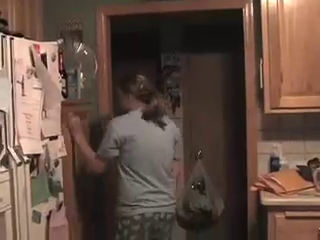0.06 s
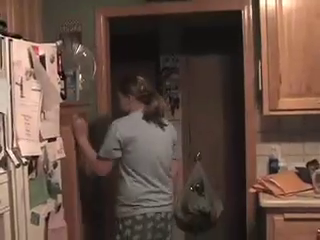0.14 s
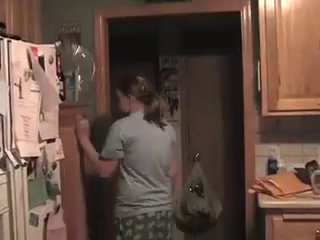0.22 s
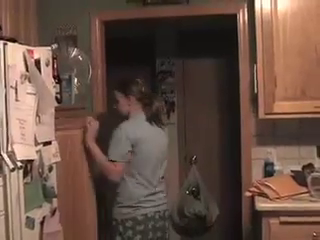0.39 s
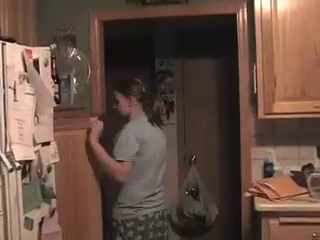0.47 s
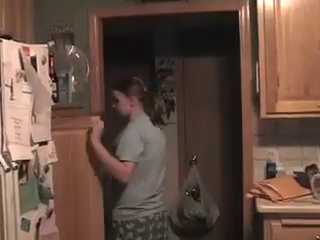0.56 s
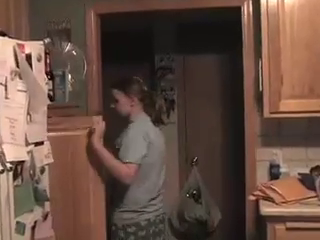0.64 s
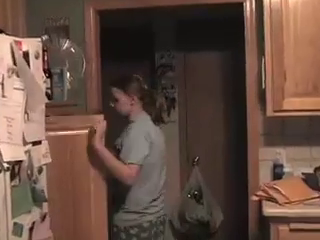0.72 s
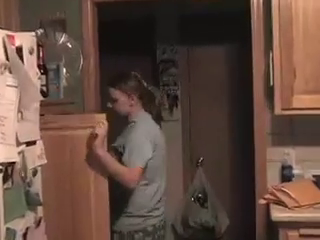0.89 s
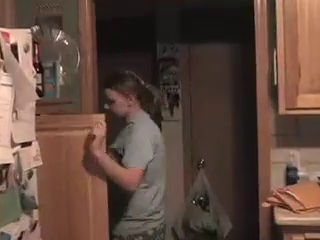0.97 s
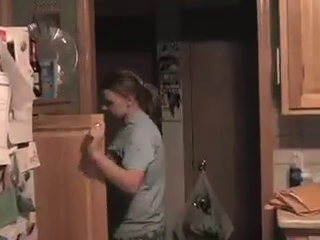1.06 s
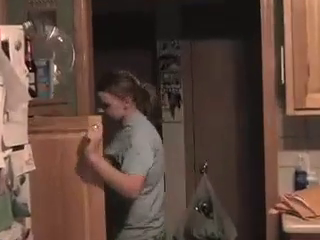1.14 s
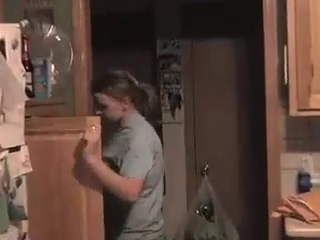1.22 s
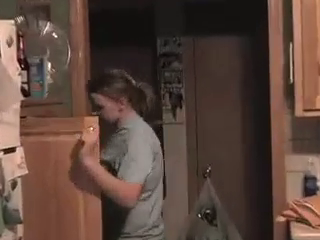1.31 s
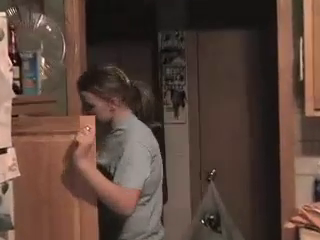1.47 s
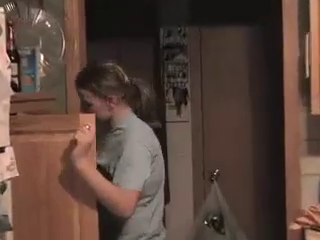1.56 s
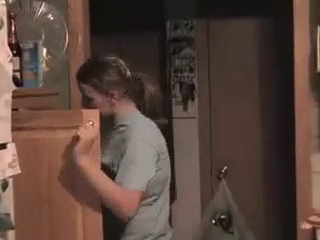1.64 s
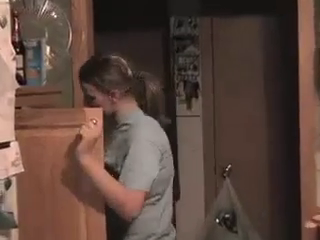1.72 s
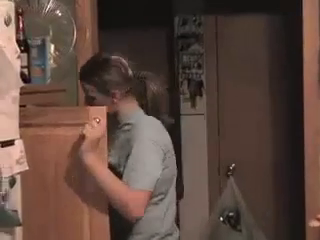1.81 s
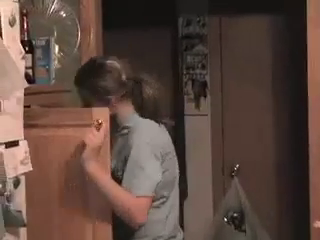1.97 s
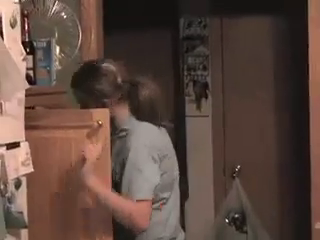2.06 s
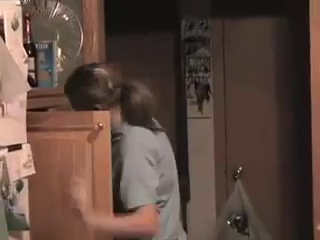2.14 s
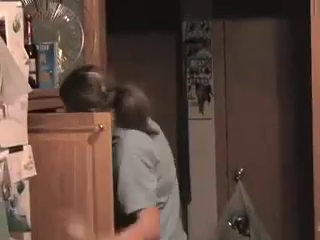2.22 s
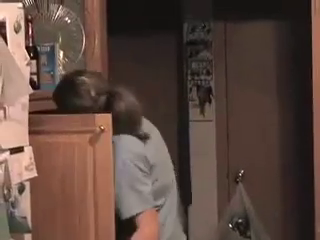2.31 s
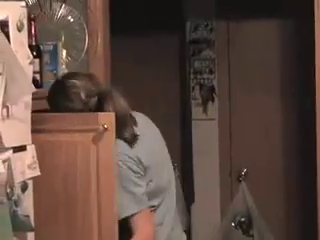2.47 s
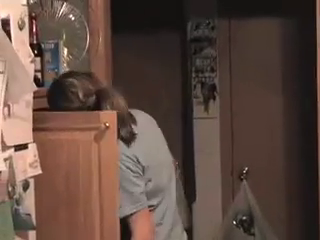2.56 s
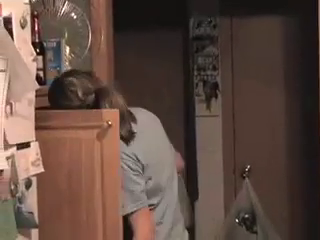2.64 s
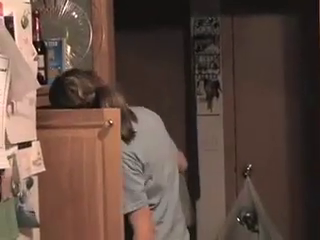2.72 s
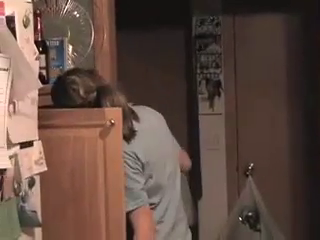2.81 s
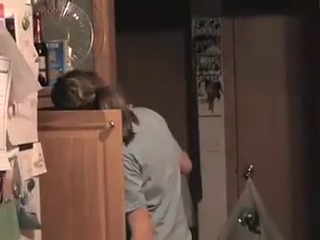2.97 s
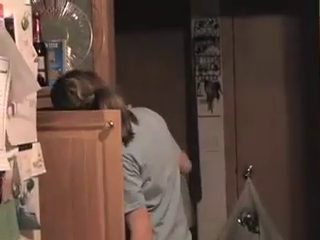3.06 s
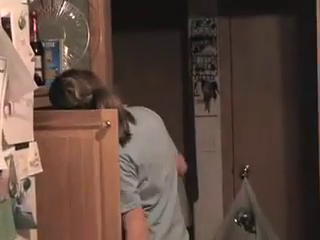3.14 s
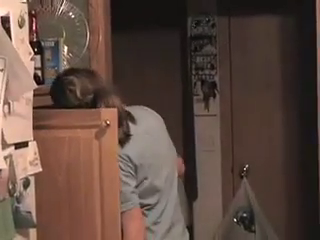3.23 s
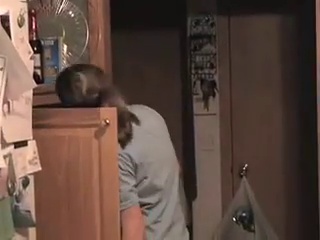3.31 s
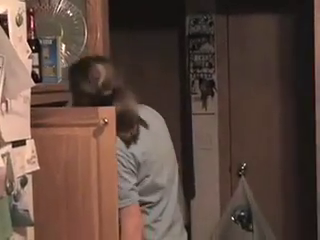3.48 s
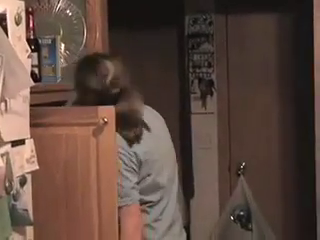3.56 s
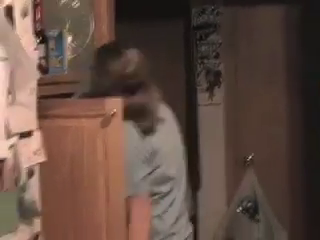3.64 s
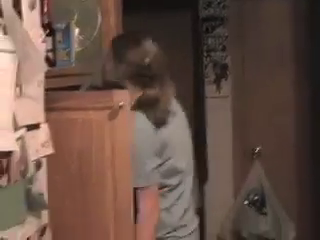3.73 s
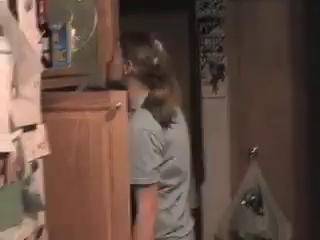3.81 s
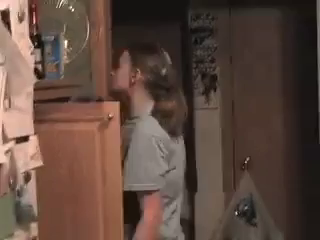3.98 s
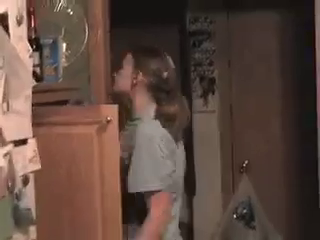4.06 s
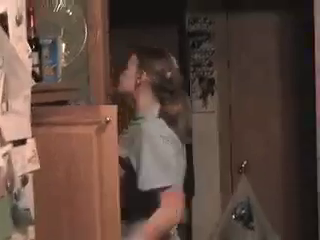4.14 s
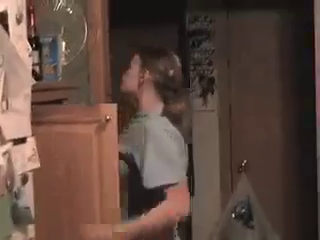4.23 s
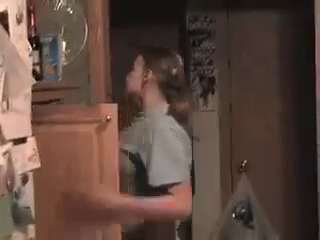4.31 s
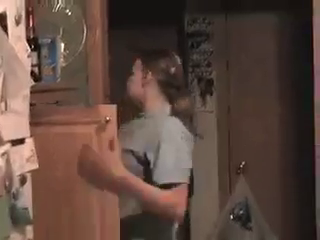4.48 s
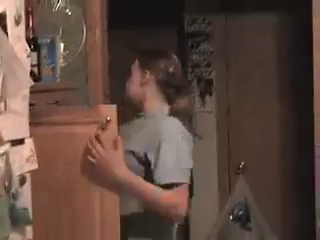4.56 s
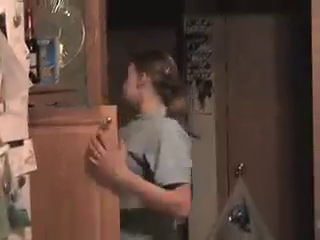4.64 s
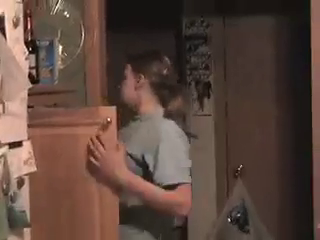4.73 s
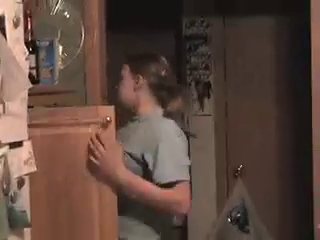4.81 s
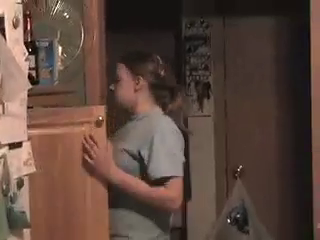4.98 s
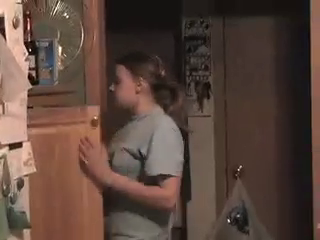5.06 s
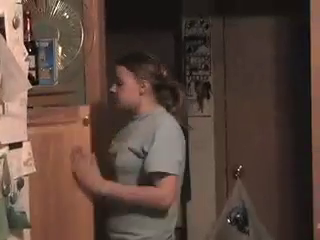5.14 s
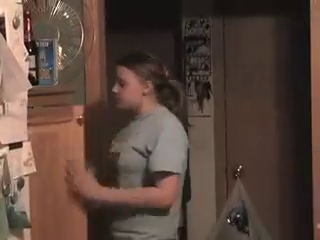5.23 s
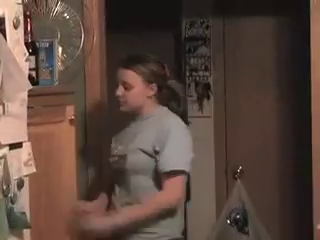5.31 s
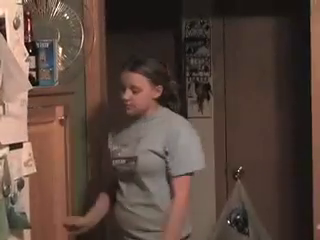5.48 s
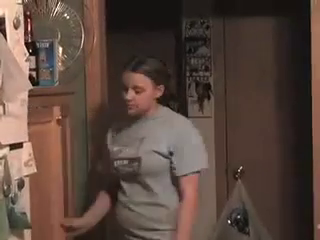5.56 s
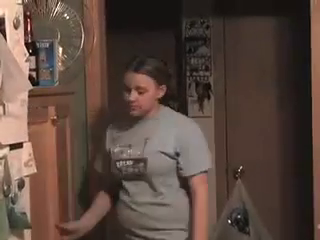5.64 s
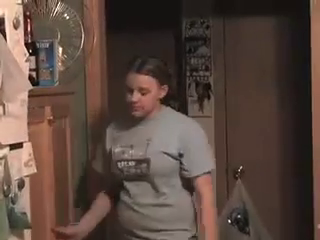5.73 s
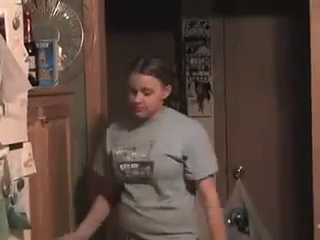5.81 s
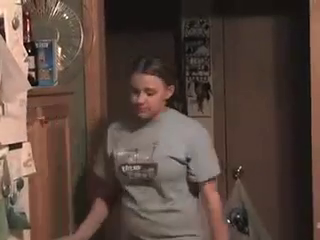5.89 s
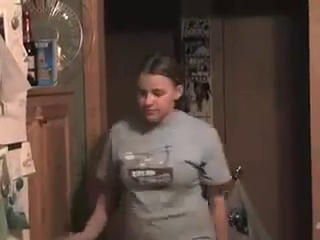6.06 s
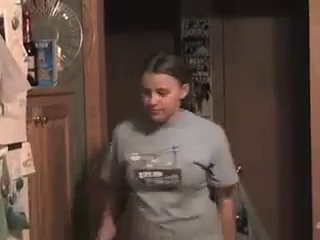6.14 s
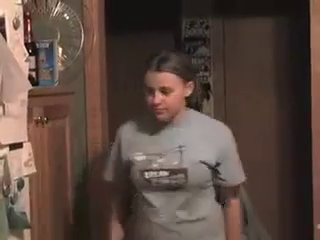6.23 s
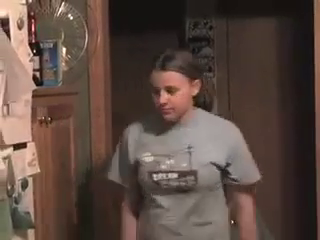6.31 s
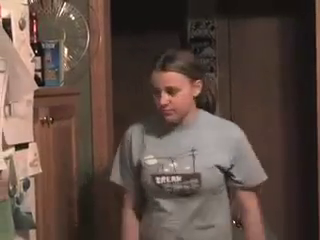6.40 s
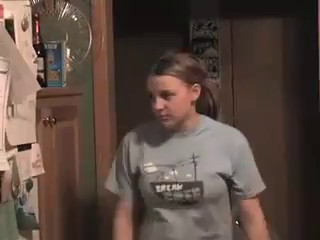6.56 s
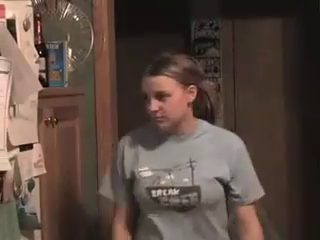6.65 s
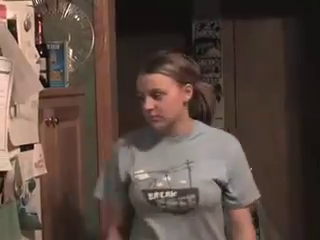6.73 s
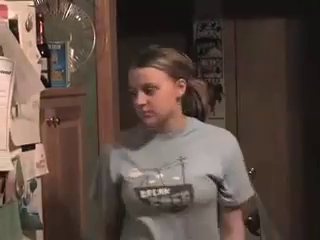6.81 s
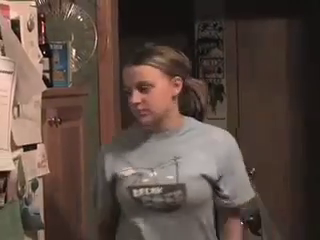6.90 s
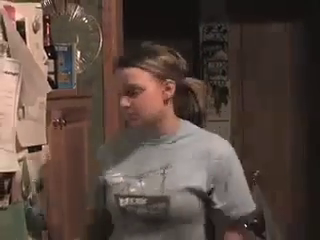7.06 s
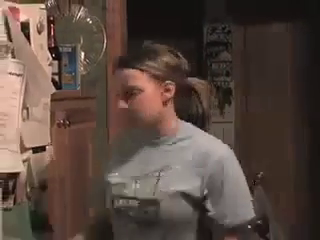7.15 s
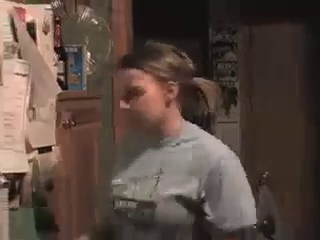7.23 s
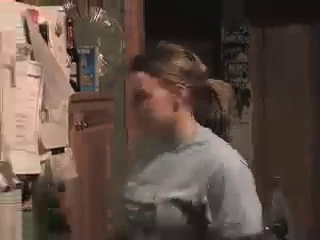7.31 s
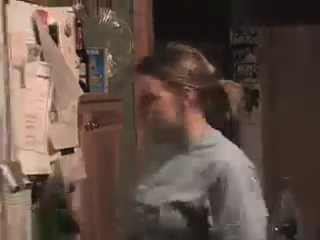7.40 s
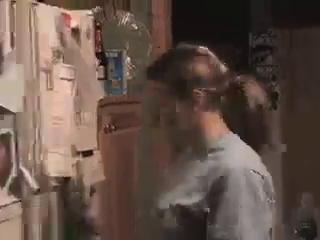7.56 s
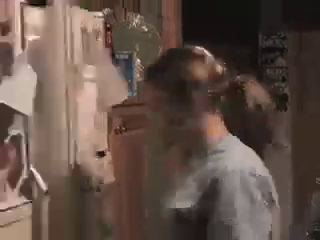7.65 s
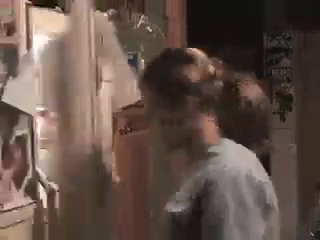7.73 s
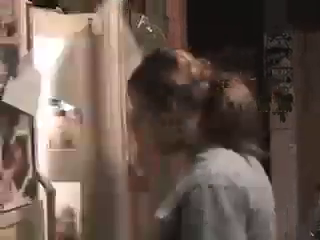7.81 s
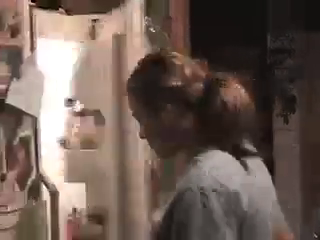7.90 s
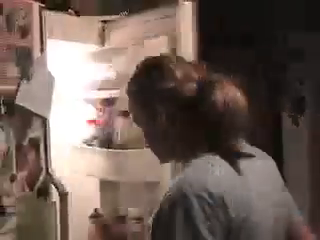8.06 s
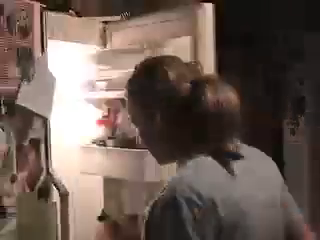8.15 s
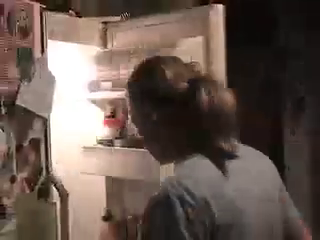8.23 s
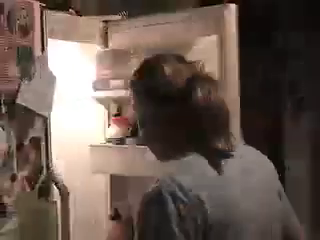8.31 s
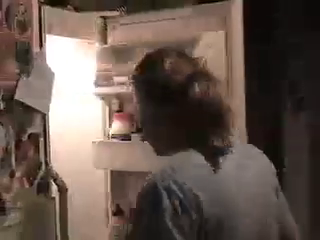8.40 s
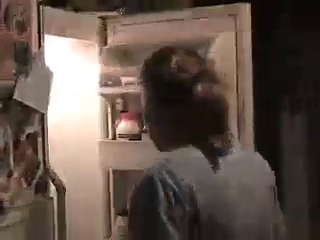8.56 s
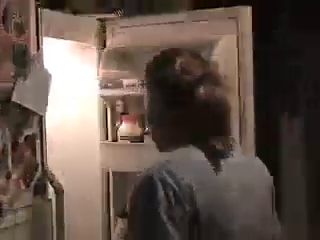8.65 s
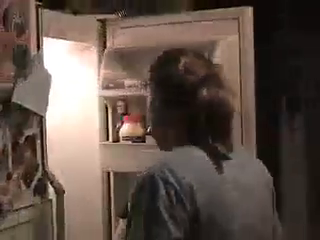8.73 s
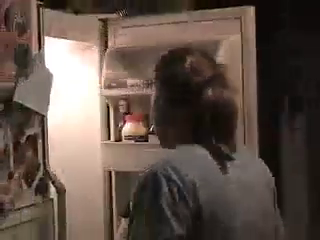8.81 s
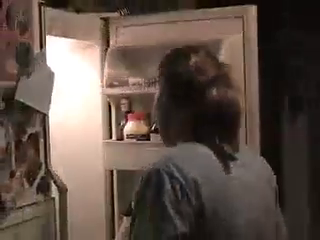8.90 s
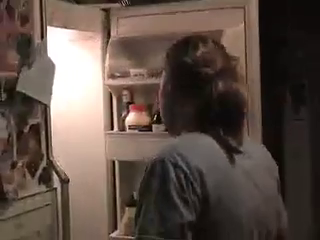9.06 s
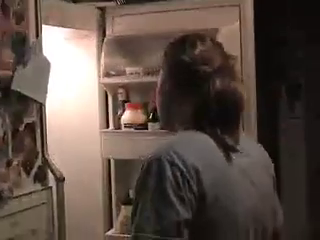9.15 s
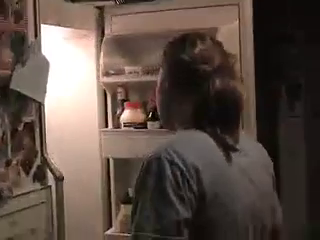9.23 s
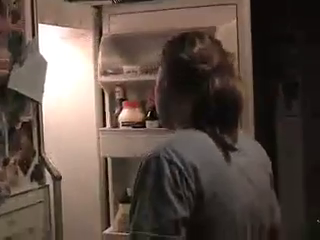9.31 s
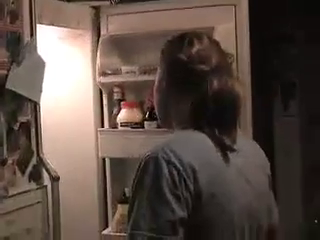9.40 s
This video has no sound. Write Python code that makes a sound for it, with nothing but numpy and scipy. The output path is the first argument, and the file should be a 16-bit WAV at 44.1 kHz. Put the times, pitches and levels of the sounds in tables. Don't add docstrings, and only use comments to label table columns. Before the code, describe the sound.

Over a dryer's low rumble and constant metallic ticking, cupboard doors bang and bounce shut, followed by a refrigerator door's softer rattles and clinks.

```python
import sys
import numpy as np
from scipy import signal
from scipy.fft import rfft, irfft, dct, next_fast_len
from scipy.io import wavfile
from scipy.ndimage import uniform_filter1d

SR = 44100
rng = np.random.default_rng(int(sys.argv[2]) if len(sys.argv) > 2 else 0)


def how_loud(loudness_db):
    steps = np.asarray(loudness_db, float) / 20
    return 10 ** steps


def int16_out(signal):
    q = np.round(np.clip(np.atleast_2d(signal).T, -1, 1) * 32767)
    wavfile.write(sys.argv[1], SR, q.astype(np.int16))


N = 417979

# [f/Hz, t60/s]
KITCHEN_T60 = [(100, 0.69), (300, 0.84), (1000, 0.68), (2500, 0.49), (6000, 0.63), (12000, 0.52)]

# [f/Hz, level/dB]
TAPE_COLOUR = [(350, -30), (450, -12), (560, -11), (598, 0), (640, -11), (850, -14), (1100, -40)]
# [t/s, level/dB, tilt/dB per octave]
GRIP_CREAKS = [
    (0.362, -21, -24),
    (.393, -34, 0),
    (.557, -37, 2),
    (1.658, -37, -2),
    (2.205, -46, 2),
    (2.866, -29.5, 8.5),
    (3.009, -32, 3),
    (3.940, -35, -3),
]
# [f/Hz, level/dB, t60/s]
CASING_MODES = [(335, -2, 0.053), (426, 5.5, 0.038), (654, 3.5, 0.043), (1600, -22, .03), (2480, -22, .02)]
# [f/Hz, phase/rad]
PORT_LEAD = [(30, 3.8), (70, 1.35), (125, 1.08), (280, 0.11), (800, 0.23), (2300, 0.55), (5500, 1.16),
             (7300, 1.7), (9000, 2.66), (11000, 2.08), (13000, 3.2)]
# [f/Hz, left - right/dB]
PORT_LEAN = [(30, 2.8), (70, .8), (120, -2), (280, -1.9), (500, 0), (6000, .6), (10500, 2), (13000, .2)]

# [f/Hz, level/dB]
HUM_LINES = [(109, -54), (119.8, -47), (127.8, -51.5)]
# [f/Hz, level/dB per Hz]
RUMBLE_COLOUR = [(15, -58), (25, -11), (48, -7), (91, -11), (113, -7), (132, 1.5), (159, -8), (193, -2.5),
                 (234, -4.5), (337, -4), (470, -14.5), (900, -14), (1380, -20.5), (2500, -24),
                 (3250, -28.5), (5500, -120)]
# [f/Hz, width/Hz, level/dB]
MOTOR_MODES = [(130, 18, -2.5), (350, 100, -4), (903, 11.4, 0.5)]
# [f/Hz, level/dB]
HISS_COLOUR = [(1000, -44), (2000, 8), (5000, 6), (8000, -4), (12000, -12), (14000, -28)]
# [f/Hz, level/dB]
STEEL_COLOUR = [(900, -10), (1900, -5.5), (3000, 3.5), (5000, 2.5), (6500, 1.5), (8500, -3.5),
                (11500, -17.5), (13500, -12), (15000, -48)]
# [f/Hz, width/Hz, level over broad colour/dB]
DRUM_MODES = [(2090, 13, 14), (2785, 34, 6.5), (3325, 20, 3.5), (3535, 20, 5), (4047, 66, 4),
              (4310, 45, -10), (5124, 70, 3.5), (5520, 74, -0.5), (6210, 44, 0), (8570, 55, 3),
              (10410, 460, 5), (11280, 200, 11.5)]
# [t/s, peak/dB]
ZIPS = [(0.4679, -34), (1.252, -30), (1.3885, -32), (1.6494, -35.5), (2.758, -30.5), (4.1055, -35),
        (4.355, -31), (4.711, -28), (5.1535, -34), (5.281, -31), (5.42, -38.5), (6.7119, -29),
        (7.0553, -35.5), (7.1126, -29.5), (7.2427, -32.5), (7.5013, -28.5), (8.102, -41.5), (8.2711, -30),
        (9.067, -29), (9.1197, -31.5), (9.2, -30), (9.4195, -31.5)]
# [t/s, peak/dB]
BUCKLES = [(0.042, -31), (1.3193, -37), (2.1624, -35.5), (3.199, -35), (3.4727, -31), (3.7143, -36),
           (3.8607, -34), (4.041, -37.5), (5.4902, -28.5), (6.6642, -33.5), (7.7917, -32.5), (8.23, -35),
           (8.662, -37.5), (8.7992, -32), (9.259, -48)]
# [t/s, peak/dB]
RIVETS = [(0.166, -31.5), (.549, -34), (0.8577, -33.5), (.999, -30), (1.284, -33.5), (1.5912, -32.5),
          (2.5563, -30.5), (2.86, -41), (2.9452, -26.5), (3.3256, -41), (3.586, -28.5), (4.51, -29),
          (4.897, -28.5), (5.5482, -31), (6.0686, -34), (6.4778, -31), (7.5745, -27), (7.965, -32.5),
          (8.418, -34.5), (8.686, -33)]
# [t/s, peak/dB]
BUTTONS = [(.368, -33), (0.7495, -29.5), (1.1958, -34.5), (1.92, -33.5), (2.086, -38.5), (2.3083, -39),
           (2.364, -30), (2.4208, -31.5), (2.705, -38.5), (3.0947, -38), (3.1481, -30.5), (3.958, -34),
           (4.26, -34.5), (5.0405, -30.5), (5.1305, -35.5), (5.686, -38.5), (5.818, -32.5), (6.996, -36),
           (7.396, -40), (7.453, -37), (8.174, -33.5), (8.568, -33.5), (9.0224, -29.5), (9.3532, -38)]
# [body/dB, brightness/dB, ring factor]
FASTENERS = [
    (4, 3.5, 1),
    (1, -5.5, 0.91),
    (0.5, 3.5, 0.6),
    (-2.5, -7.5, 0.5),
]
# [t/s, peak/dB]
STUDS = [(.0992, -37), (.6325, -43), (1.6357, -32), (2.2313, -39.5), (2.81, -34), (3.7903, -38.5),
         (3.8304, -38.5), (4.4782, -36.5), (5.895, -42), (6.6133, -43.5), (6.9343, -38), (7.185, -36),
         (7.3292, -39.5), (7.773, -38), (8.955, -45), (9.2936, -34), (9.4609, -30)]

# [t/s, level/dB, f/Hz, t60/s]
CRACKS = [(1.761, -29, 3300, .012), (1.7655, -17, 2200, 0.011), (1.771, -21, 1900, .015),
          (2.0033, -19, 2010, 0.011), (2.0077, -27, 1800, .015), (4.5505, -12, 2000, .012),
          (4.548, -19, 4200, .012), (4.553, -22, 3230, 0.013), (4.556, -18, 2400, .012),
          (4.599, -9, 1110, .015), (4.564, -15, 1500, 0.017), (4.7325, -15, 2200, .012),
          (4.845, -36, 1900, .012), (5.9245, -10, 1700, 0.0092), (5.926, -13, 3960, .015),
          (5.9302, -10, 1850, 0.01), (5.9295, -5, 1640, 0.046), (5.9725, -22, 4500, .03),
          (5.921, -19, 4570, .012), (5.9775, -9, 1500, .012), (6.107, -30, 2400, .012),
          (6.2272, -0.5, 2340, 0.012), (6.2345, -26, 6500, 0.0091), (6.2362, -4, 2400, 0.01),
          (6.229, -17, 4020, .015), (6.244, -7, 1500, 0.014), (6.329, -24, 4200, .012),
          (6.33, -19, 2500, 0.0081), (6.333, -7, 1420, .02), (6.3365, -30, 6500, 0.011),
          (6.3395, -12, 1250, .012), (6.346, -6, 1150, .012), (6.3512, -11, 1700, .012),
          (6.365, -12, 1490, .012), (7.5762, -16, 2030, 0.013), (7.5845, -23, 2150, .012),
          (7.589, -14.5, 1360, .012), (7.731, -37, 2000, .015), (7.5755, -32, 3200, .012),
          (7.8075, -31, 1900, .01), (7.8985, -23.5, 1440, 0.017), (7.905, -28, 1240, .012)]
# [t/s, # level/dB, f/Hz, t60/s]
TAPS = [(.136, -37, 906, 0.054), (.222, -35, 880, .05), (.358, -36, 1100, .03), (2.232, -35, 800, 0.037),
        (2.575, -39, 1300, .03), (2.865, -34, 1300, .025), (3.011, -37, 1300, .025),
        (3.33, -36.5, 903, .12), (3.725, -39, 850, .05), (4.11, -31, 908, 0.064), (5.02, -37, 1300, .03),
        (5.388, -30.5, 1098, .05), (5.68, -34.5, 900, .06), (6.69, -30, 1750, .05), (8.42, -37, 906, .1),
        (8.815, -36, 884, 0.066), (8.878, -37, 896, .06), (9.198, -35.5, 710, 0.13),
        (9.445, -35.5, 2080, .2)]
# [t/s, level/dB, f/Hz, t60/s]
PANEL_NOTES = [(1.772, -22, 200.5, 0.19), (2.01, -34, 203, 0.1), (4.585, -12, 294, 0.11), (4.752, -35, 300, 0.07),
               (5.94, -32, 42, .4), (6.232, -17, 280, 0.23), (6.24, -28, 40, .6), (6.35, -15, 575, 0.18),
               (6.72, -30, 34, 0.55), (4.56, -19.5, 840, 0.19), (4.555, -27, 204, 0.14), (7.695, -24, 610, 0.046),
               (7.565, -22.5, 290, .06), (7, -31.5, 331, 0.18), (7.657, -26.5, 1600, 0.1), (7.2, -30, 940, 0.1),
               (7.588, -28, 2500, .08),
               (1.78, -25, 667, .08), (2.003, -34, 1610, .09), (4.585, -21, 1480, .12), (4.735, -30, 1593, .08),
         (5.926, -18, 805, .06), (5.978, -20, 2220, .04), (6.347, -14, 1614, .04), (6.412, -20, 1147, .05),
         (6.86, -25, 214, .1), (7.608, -29, 836, .08), (7.682, -24, 420, .07), (7.77, -28, 882, .05),
         (7.778, -24, 434, .12), (7.9, -33, 1070, .06), (1.775, -33, 84, .3), (2.012, -36, 82, 0.27),
         (2.565, -37, 82, .35)]

# [t/s, peak/dB, boom/dB, snap/dB, ring factor]
FRIDGE_BLOWS = [
    (7.421, -28, 9.5, 7.5, 0.89),
    (7.553, -31, 4, 5, 0.9),
    (7.575, -23, 0, 4, 0.67),
    (7.599, -23.5, 2, -4, 0.33),
    (7.654, -21, -2.5, -5, 0.5),
    (7.729, -24.5, -6, -4.5, 0.79),
    (7.81, -28, -1, -7, 0.43),
    (7.844, -34.5, -15, -6, 0.82),
    (7.895, -28, 4, 9, 0.52),
    (8.495, -31.5, 9, 1, 1),
]
# [f/Hz, level/dB]
BOX_COLOUR = [(59, -29), (100, -5), (248, -5), (337, -6.5), (374, -6.5), (422, -4), (730, -7), (1240, -8.5),
              (6000, -25), (7800, -31), (13200, -120)]
# [f/Hz, width/Hz, level/dB]
SHELL_MODES = [(245, 25, 4.9), (335, 10, 9.4), (927, 180, 0.8), (1900, 320, 0.68)]
# [t/s, level/dB, f/Hz, t60/s]
JARS = [
    (7.6, -31, 950, 0.11),
    (7.654, -21.5, 732, 0.14),
    (7.732, -37, 1890, 0.092),
    (7.81, -27.5, 762, 0.13),
    (7.896, -26, 692, 0.067),
    (8.492, -31, 671, 0.34),
    (8.515, -32, 388, 0.21),
]

# [t/s, peak/dB, boom/dB, snap/dB, ring factor]
SWEEPS = [
    (6.2, -35.5, -22, 4, 0.49),
    (7.535, -37, 3.5, -9, 0.88),
]
# [t/s, peak/dB, boom/dB, snap/dB, ring factor]
KNOCKS = [
    (1.763, -19.5, 5, -2, 0.59),
    (2.001, -22, 9, -1, 0.59),
    (4.544, -17, -5, 11.5, 0.33),
    (4.549, -10, 2, 1.5, 0.71),
    (4.732, -19.5, 5.5, 0, 0.59),
    (4.845, -27.5, 9, -3, 0.52),
    (4.895, -31, 15, -13, 0.27),
    (5.019, -32, 12.5, -13, 0.7),
    (6.689, -32.5, 11.5, -8, 0.59),
]
# [t/s, peak/dB, boom/dB, snap/dB, ring factor]
SHUTS = [
    (5.921, -11, -11, 0.5, 0.27),
    (5.929, -7, -2.5, -2.5, 0.83),
    (5.976, -8.5, 6, 1, 0.61),
    (6.106, -26, -18, -6, 0.62),
]
# [t/s, peak/dB, boom/dB, snap/dB, ring factor]
SLAMS = [
    (6.225, -4, -1, 4, 1),
    (6.235, -5.5, -7, -2, 0.84),
    (6.328, -6, -6.5, 2, 1),
    (6.349, -9.5, -0.5, -19, 0.64),
    (6.409, -16.5, 7, -8, 1),
    (6.518, -21, 7, -10, 0.97),
]
# [t/s, peak/dB, depth/dB, body/dB]
THUMPS = [
    (1.771, -39, 3, -6),
    (2.01, -35.5, -16, 12),
    (2.55, -41, -6, 4),
    (4.55, -31, 7, -13),
    (5.922, -22, 11, -11),
    (6.227, -37.5, -5, -2),
    (6.738, -43, -2, 9),
]
# [t/s, peak/dB, boom/dB, snap/dB]
BUMPS = [
    (0.007, -36, 0, -14),
    (0.357, -38.5, -5, -12.5),
    (1.244, -39, 18, -3),
    (2.556, -36, 18, 0),
    (5.39, -43.5, -6, 19),
    (6.799, -40.5, 11, 11),
    (6.917, -37, 0, -11),
]
# [f/Hz, level/dB]
WOOD_COLOUR = [(24, -52), (40, -14), (195, -15), (251, -17), (287, -12.5), (462, -12.5), (1500, -9),
               (5340, -26), (7340, -39.5), (9000, -101)]
# [f/Hz, level/dB]
FRAME_COLOUR = [(35, -29), (60, 0.5), (125, -12.5), (199, 0.5), (331, -18.5), (370, -6), (1090, -9),
                (1600, -13), (4730, -21.5), (12000, -44), (15600, -86)]
# [f/Hz, level/dB]
PANEL_COLOUR = [(35, -38), (60, -1), (190, -1), (227, -6), (283, -0.5), (629, -1), (1430, -3.5),
                (5520, -22), (10500, -40), (12000, -68), (15600, -100)]
# [f/Hz, level/dB]
FLESH_COLOUR = [(50, -27), (100, -1), (330, 1), (600, -4.5), (1200, -5.5), (2500, -18)]
# [f/Hz, level/dB]
THUMP_COLOUR = [(22, -45), (48, -15), (80, -6.5), (130, -21), (200, -38.5)]
# [f/Hz, width/Hz, level/dB]
DOOR_MODES = [(204.4, 14, 13.5), (289, 21, 4), (645, 14, 1.5), (1268, 15, -1.5), (1477, 15, 1),
              (1587, 13, 5), (1810, 100, 0), (2230, 180, 0.5), (2670, 69, 0), (3050, 52, 2), (3730, 42, -1)]
# [f/Hz, width/Hz, level/dB]
LATCH_MODES = [(298, 53, 7.9), (675, 36, 1.7), (1250, 43, 1.6), (1640, 150, 5.7), (1900, 150, 2.4),
               (2320, 940, 3), (4300, 280, 1.1)]
# [f/Hz, width/Hz, level/dB]
CARCASS_MODES = [(196, 11, 8.8), (283, 150, 1.8), (576, 13, 2), (822, 12, 1.2), (1135, 32, 5.3),
                 (1300, 15, 1.8), (1527, 58, 1.9), (1750, 59, 3.5), (2040, 44, 1.6), (2240, 91, 3),
                 (2650, 190, 2), (3316, 40, 1.1)]
# [f/Hz, width/Hz, level/dB]
KNUCKLE_MODES = [(330, 120, 6), (1130, 40, 2.1)]

# [f/Hz, level over side/dB]
GATE = [(7000, -24), (7800, -7), (8400, 6), (9400, 8.5), (9700, -9), (11100, -6), (11700, 12), (12300, 25)]
# [f/Hz, level over stronger of middle and side/dB]
ROUNDING = [(300, -26.5), (1300, -13), (5500, -13), (9000, -5)]
SHARP_TICKS = [.749, .865, 1.005, 1.237, 1.26, 1.585, 2.351, 2.56, 2.77, 2.793, 2.955, 3.141, 3.327, 3.466,
               3.582, 4.511, 4.906, 5.045, 5.532, 5.927, 6.067, 6.229, 7.111, 7.251, 7.506, 7.576, 8.272,
               8.296, 8.412, 8.806, 9.015, 9.062, 9.47]
BRISK_TICKS = [.006, .169, .378, .471, 1.4, 1.92, 2.003, 2.166, 3.164, 3.698, 6.206, 6.717, 6.93, 7.971,
               8.574, 8.667, 8.69, 9.085]


def along(points, hz):
    f, value = np.transpose(points)
    return np.interp(np.log(hz + 1), np.log(f + 1), value)


def filtered(x, response):
    size = next_fast_len(x.shape[-1] + 4096)
    hz = np.fft.rfftfreq(size, 1 / SR)
    return irfft(rfft(x, size) * response(hz), size)[..., :x.shape[-1]]


def resonant(x, modes, scatter_db=0):
    centre_hz, width_hz, db = (v[:, None] for v in np.transpose(modes))

    def response(f):
        bells = 1j * f * width_hz / (centre_hz ** 2 - f * f + 1j * f * width_hz)
        return 1 + np.squeeze(how_loud(db.T + scatter_db) @ bells)[..., None, :]

    return filtered(x, response)


def ports(pair, alike):
    turn = np.arccos(np.clip(alike, -1, 1)) / 2
    common, other = np.cos(turn) * pair[0], np.sin(turn) * pair[1]
    return np.array([common + other, common - other])


def rush(spectrum, patchy_db):
    z = signal.stft(rng.standard_normal((2, N)), SR, nperseg=1024)[2]
    field = uniform_filter1d(rng.standard_normal(z.shape[1:]), size=8, axis=0)
    field = uniform_filter1d(field, size=5, axis=1)
    x = signal.istft(z * how_loud(patchy_db * field / field.std()), nperseg=1024)[1][:, :N]
    x = filtered(x, lambda f: how_loud(along(spectrum, f)))
    return x / x.std()


def strikes(rows, colour, modes, pivots_hz, rise_s, first_db, first_t60_s, scatter_db):
    start_s, peak_db, low_db, high_db, ring = (v[:, None, None, None] for v in np.transpose(rows))
    size = int(.37 * SR)
    hz, frame_s, z = signal.stft(rng.standard_normal((len(rows), 2, size)), SR, nperseg=256)
    low_hz, mid_hz, high_hz = pivots_hz
    lows = along([(low_hz, 1), (mid_hz, 0)], hz)[:, None]
    highs = along([(mid_hz, 0), (high_hz, 1)], hz)[:, None]
    tone_db = low_db * lows + high_db * highs
    fade_db = -60 * frame_s / (along(KITCHEN_T60, hz)[:, None] * ring)
    x = signal.istft(z * how_loud(tone_db + fade_db), SR, nperseg=256)[1][..., :size]
    x = filtered(x, lambda f: how_loud(along(colour, f)))
    t = np.arange(size) / SR
    onset = 1 - np.exp(-t / rise_s)
    first = 1 + how_loud(first_db - 60 * t / first_t60_s)
    fade_out = np.minimum(1, (t[-1] - t) * 20)
    x = x * onset * first * fade_out
    x = resonant(x, modes, scatter_db * rng.standard_normal((len(rows), len(modes))))
    x = x * how_loud(peak_db[..., 0]) / x[..., :SR // 50].std(axis=(1, 2), keepdims=True)
    out = np.zeros((2, N + size))
    for start, blow in zip(start_s.ravel(), x):
        out[:, round(start * SR):][:, :size] += blow
    return out[:, :N]


def pings(rows, rise_share):
    out, t = np.zeros((2, N + SR)), np.arange(SR // 2) / SR
    for s, db, hz, t60 in rows:
        onset = 1 - np.exp(-t / (rise_share * t60))
        out[0, round(s * SR):][:len(t)] += how_loud(db - 60 * t / t60) * np.sin(2 * np.pi * hz * t) * onset
    return out[:, :N]


def camera_body():
    motor = ports(how_loud(-57) * rush(TAPE_COLOUR, patchy_db=1), alike=-.9)
    creaks, t = np.zeros(N), np.arange(SR // 10) / SR
    onset = 1 - np.exp(-t / 0.0014)
    for s, db, tilt_db in GRIP_CREAKS:
        ring = 0
        for hz, mode_db, t60 in CASING_MODES:
            level_db = mode_db + tilt_db * np.log2(hz / 430)
            ring = ring + how_loud(level_db - 60 * t / t60) * np.sin(2 * np.pi * hz * t)
        creaks[round(s * SR):][:len(t)] += how_loud(db) * ring * onset
    return motor + creaks * np.array([[1.2], [-.8]])


def dryer():
    t = np.arange(N) / SR
    hum = sum(how_loud(db) * np.sin(2 * np.pi * hz * t) for hz, db in HUM_LINES) * np.array([[1], [0]])
    rumble = hum + how_loud(-42.0) * resonant(rush(RUMBLE_COLOUR, patchy_db=2), MOTOR_MODES)
    air = how_loud(-53.0) * rush(HISS_COLOUR, patchy_db=5.0)
    kinds = zip((ZIPS, BUCKLES, RIVETS, BUTTONS), FASTENERS)
    contacts = sorted(hit + colour for hits, colour in kinds for hit in hits)
    ticks = strikes(contacts, STEEL_COLOUR, DRUM_MODES, (2000, 4500, 11000), rise_s=0.00013,
                    first_db=-13, first_t60_s=0.0029, scatter_db=2.5)
    return ports(rumble, alike=0.83) + ports(how_loud(-8) * ticks + air, alike=0.91)


def small_contacts():
    grazes = [(*hit, 1, -1, .6) for hit in STUDS]
    studs = strikes(grazes, STEEL_COLOUR, DRUM_MODES, (2000, 4500, 11000), rise_s=0.00036,
                    first_db=-2, first_t60_s=0.004, scatter_db=3.0)
    cracks = pings(CRACKS, rise_share=0.031)
    taps = pings(TAPS, rise_share=0.045)
    panels = pings(PANEL_NOTES, rise_share=0.058)
    return ports(cracks + taps + panels + how_loud(-9) * studs, alike=.93)


def refrigerator():
    blows = strikes(FRIDGE_BLOWS, BOX_COLOUR, SHELL_MODES, (250, 900, 2500), rise_s=0.0012,
                    first_db=-6.5, first_t60_s=0.017, scatter_db=0)
    notes, t = np.zeros((2, N)), np.arange(SR // 4) / SR
    onset = 1 - np.exp(-t / 0.0019)
    for s, db, hz, t60 in JARS:
        notes[0, round(s * SR):][:len(t)] += how_loud(db - 60 * t / t60) * np.sin(2 * np.pi * hz * t) * onset
    return ports(how_loud(-8.0) * blows + notes, alike=0.92)


def sweeps():
    rubs = strikes(SWEEPS, PANEL_COLOUR, SHELL_MODES, (200, 1200, 5000), rise_s=0.048,
                   first_db=-30, first_t60_s=.05, scatter_db=0)
    return ports(rubs, alike=0.97)


def cupboards():
    wood_hz = (200, 1200, 5000)
    knocks = strikes(KNOCKS, WOOD_COLOUR, DOOR_MODES, wood_hz, rise_s=0.0036,
                     first_db=13.0, first_t60_s=0.0083, scatter_db=2.0)
    shuts = strikes(SHUTS, FRAME_COLOUR, LATCH_MODES, wood_hz, rise_s=0.0014,
                    first_db=4.5, first_t60_s=0.034, scatter_db=0)
    slams = strikes(SLAMS, PANEL_COLOUR, CARCASS_MODES, wood_hz, rise_s=0.0018,
                    first_db=3.0, first_t60_s=0.072, scatter_db=0.5)
    soft = [(*hit, 0.38) for hit in BUMPS]
    bumps = strikes(soft, FLESH_COLOUR, KNUCKLE_MODES, (100, 330, 1200), rise_s=0.0025,
                    first_db=15, first_t60_s=0.017, scatter_db=2.0)
    puffs = [(*hit, 0.85) for hit in THUMPS]
    thumps = strikes(puffs, THUMP_COLOUR, [(82.5, 59, 3)], (30, 60, 120), rise_s=0.0059,
                     first_db=5.0, first_t60_s=0.2, scatter_db=2.5)
    wooden = how_loud(-4.5) * knocks + how_loud(-8.5) * (shuts + slams)
    return ports(wooden + how_loud(2.5) * bumps + how_loud(-4.5) * thumps, alike=0.93)


def scene():
    return camera_body() + dryer() + small_contacts() + refrigerator() + sweeps() + cupboards()


def starved(x, fickle_db, sharp_db):
    block, lead, band = 1024, 270, 32
    top_hz, ragged_hz, brisk_top_hz = 13650, 380, 12300
    count = N // block + 3
    pair = np.array([x[0] + x[1], x[0] - x[1]]) / 2
    pair = np.pad(pair, ((0, 0), (lead + block, 3 * block)))
    window = signal.windows.kaiser_bessel_derived(2 * block, 4 * np.pi)
    index = block * np.arange(count)[:, None] + np.arange(2 * block)
    a, b, c, d = np.split(pair[:, index] * window, 4, axis=2)
    folded = np.concatenate([-c[..., ::-1] - d, a - b[..., ::-1]], axis=2)
    lines = dct(folded, type=4, norm="ortho")
    hz = np.arange(block) * SR / 2 / block
    level = np.sqrt(np.abs(uniform_filter1d(lines ** 2, size=band, axis=2))) + 1e-9
    spare = how_loud(fickle_db * np.repeat(rng.standard_normal((count, block // band)), band, axis=1))

    def frames(times):
        hit = np.floor((np.array(times) * SR + lead) / block)
        return np.isin(np.arange(count), hit)[:, None]

    sharp = frames(SHARP_TICKS)
    rich = sharp | (frames(BRISK_TICKS) & (hz < brisk_top_hz))
    strong = np.abs(lines[0]) > level[1] * spare * how_loud(along(GATE, hz))
    keep = strong | rich | (hz < GATE[0][0])
    inside = hz < top_hz + ragged_hz * (rng.standard_normal((count, 1)) + sharp)
    step = level.max(axis=0) * how_loud(along(ROUNDING, hz) + sharp_db * rich)
    rounded = np.round(lines / step) * step * np.array([keep & inside, inside])
    late, early = np.split(dct(rounded, type=4, norm="ortho"), 2, axis=2)
    whole = np.concatenate([early, -early[..., ::-1], -late[..., ::-1], -late], axis=2) * window
    joined = whole[:, 1:, :block] + whole[:, :-1, block:]
    mid, side = joined.reshape(2, -1)[:, lead:lead + N]
    return mid + np.array([[1], [-1]]) * side


def top_cut(x):
    return signal.sosfilt(signal.butter(12, 14400, fs=SR, output="sos"), x)


def record(dry):
    side = np.array([[1], [-1]])
    x = dry / (1 + np.abs(dry / .95) ** 6) ** (1 / 6)

    def port_network(f):
        balance = how_loud(side * along(PORT_LEAN, f) / 2)
        phase = np.exp(-.5j * side * along(PORT_LEAD, f))
        return (f < 15000) * balance * phase

    mix = starved(filtered(x, port_network), fickle_db=6.0, sharp_db=-8.5)
    return top_cut(mix)


dry = scene()
out = record(dry)
int16_out(out)
```